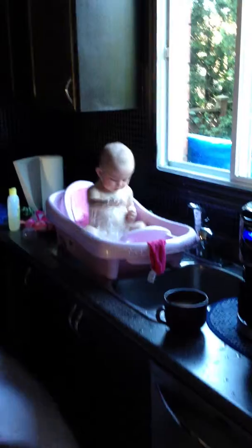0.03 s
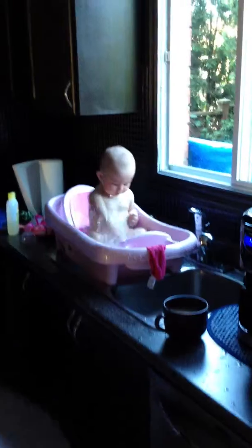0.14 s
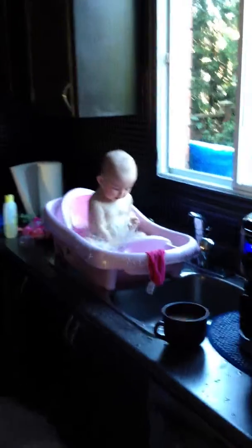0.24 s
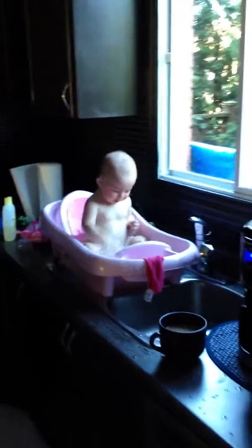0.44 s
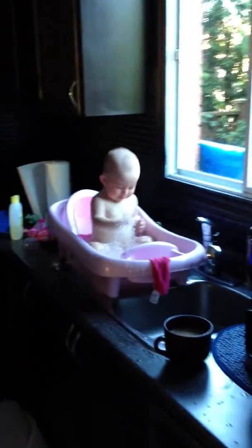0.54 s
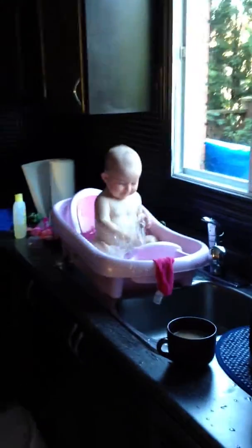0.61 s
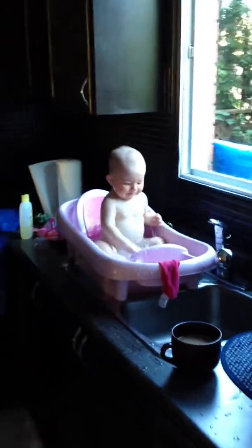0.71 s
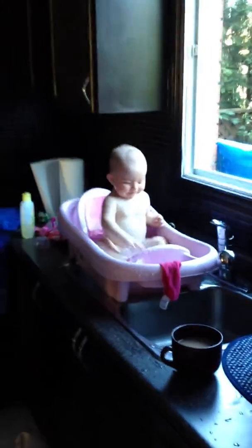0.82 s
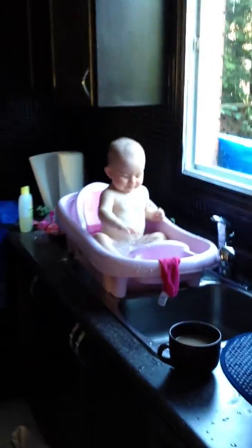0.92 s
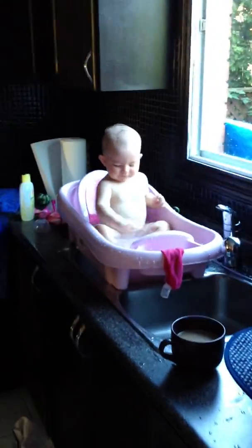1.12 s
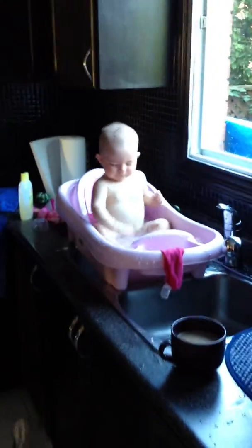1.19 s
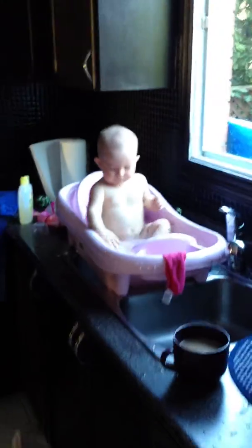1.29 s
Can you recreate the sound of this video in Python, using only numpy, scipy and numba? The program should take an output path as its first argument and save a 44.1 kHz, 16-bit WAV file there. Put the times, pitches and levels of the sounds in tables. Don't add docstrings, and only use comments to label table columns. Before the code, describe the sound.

A baby's hand splashes bathwater, first a bright spray, then the strongest slap with a plunking air pocket, then fading bubbles and one light plastic tick; short indoor echo, faint fridge hum, phone nearby.

```python
import sys
import numpy as np
from scipy import signal
from scipy.io import wavfile
from scipy.ndimage import uniform_filter1d
from numba import njit

SR = 44100
rng = np.random.default_rng(int(sys.argv[2]) if len(sys.argv) > 2 else 0)


def volts_from_decibels(level):
    exponent = np.asarray(level, float) / 20
    return 10 ** exponent


def transcribe(u):
    v = np.clip(np.atleast_2d(u).T, -1, 1)
    q = np.round(v * 32767).astype(np.int16)
    wavfile.write(sys.argv[1], SR, q)


N = 59535
TUB_LOW_HZ = 600


def level(x, db):
    return x * volts_from_decibels(db) / np.sqrt(np.mean(x ** 2))


def band(x, hz, width_hz):
    return signal.lfilter(*signal.iirpeak(hz, hz / width_hz, fs=SR), x)


@njit
def rings(start, hz, t60, size, glide, n, sr):
    out = np.zeros(n)
    for g in range(len(start)):
        first, length = int(start[g] * sr), int(t60[g] * sr)
        fade = np.exp(-np.log(1000.) / (length + 1))
        step = 2 * np.pi * hz[g] / sr
        height, phase = size[g], 0.
        for k in range(max(first, 0), min(first + length, n)):
            out[k] += height * np.sin(phase)
            height *= fade
            phase += step * (1 + glide * (k - first) / length)
    return out


def cloud(s, db, hz, octaves, fade_s, cycles=9.9, rise_s=0.0016, count=2500):
    scatter_db, glide = 2.2, 0.66
    lowest_hz, highest_hz = 120, 15300
    late = 4 * fade_s * rng.random(count)
    pitch = hz * 2 ** (octaves * rng.standard_normal(count))
    t60 = np.minimum(np.log(1000) * cycles / np.pi / pitch, .12)
    size = volts_from_decibels(-scatter_db * np.log(1 - rng.random(count)))
    size = size * np.exp(-late / fade_s) * (1 - np.exp(-late / rise_s))
    size = size * np.sqrt(pitch / hz) * (pitch > lowest_hz) * (pitch < highest_hz)
    power = np.sum(size ** 2 * t60) / (4 * np.log(1000)) / (fade_s / 2)
    return rings(s + late, pitch, t60, size * volts_from_decibels(db) / np.sqrt(power), glide / cycles, N, 1. * SR)


# start in seconds, level in dB, centre pitch in Hz, spread in octaves,
# fade in seconds.
SPLASH_ROWS = [(.06, -48.5, 2254, 1.303, .15), (0.149, -47, 2890, 1.37, .03),
               (0.206, -32.5, 4500, 0.84, .03), (.24, -40.5, 2630, 0.82, .05),
               (0.312, -42.5, 3900, 0.22, 0.036), (.342, -33, 2080, 0.2, .006),
               (.36, -35, 2600, 0.784, .035), (.41, -43, 1510, 0.95, .05), (0.472, -44, 990, 0.35, .05),
               (0.52, -44, 2480, 0.68, .05), (0.602, -46.5, 2685, 1.13, .05),
               (.704, -43, 2600, 0.73, 0.013), (.722, -42.5, 3440, 0.44, 0.02),
               (.65, -52, 3050, 0.96, 0.072), (0.772, -41.5, 3550, 0.18, 0.017),
               (.795, -49, 1270, 1.23, .04), (0.872, -54, 2480, 0.49, .05), (1.035, -61, 3630, 0.22, .03),
               (1.14, -67, 4530, 0.15, 0.037), (.343, -44, 4260, 0.736, 0.11),
               (0.518, -51, 5000, .7, 0.083)]


def splashes():
    return sum(cloud(*row) for row in SPLASH_ROWS)


# start in seconds, level in dB, fade in seconds.
SPRAY_ROWS = [(.085, -59.5, 0.059), (.163, -62, 0.057), (.208, -38, 0.032), (.337, -56, 0.091),
              (.46, -70, 0.059), (.6, -56, 0.03), (.653, -56, 0.018), (0.684, -51.5, 0.018),
              (.7, -57.5, .05), (.818, -59.5, 0.043), (.92, -61.5, 0.031)]


def spray():
    return sum(cloud(s, db, 11300, 0.32, fade_s, rise_s=0.0018) for s, db, fade_s in SPRAY_ROWS)


# start in seconds, level in dB, pitch in Hz, fade in seconds.
GURGLE_ROWS = [(.085, -52.5, 660, 0.029), (.462, -51, 4200, .012), (.14, -49, 867, 0.021),
               (.368, -66, 770, .03), (.372, -35.5, 1162, .02), (.4, -57, 850, .03),
               (.472, -41.5, 883, 0.027), (.5, -45, 965, .025), (.523, -46, 1940, .04),
               (0.554, -46, 3020, 0.014), (.575, -46, 668, 0.037), (.6, -51, 1250, 0.026),
               (.64, -58.5, 680, 0.043), (0.711, -48, 1750, .03), (0.729, -51, 1220, .04),
               (.79, -55.5, 600, .03), (.82, -64, 540, 0.041), (.774, -50, 3560, .015),
               (.87, -57, 1940, .03), (1.071, -60.5, 1430, 0.033), (0.791, -52, 2660, 0.019)]


def gurgles():
    return sum(cloud(s, db, hz, 0.056, fade_s, cycles=10.4, count=24) for s, db, hz, fade_s in GURGLE_ROWS)


# start in seconds, level in dB, pitch in Hz, fade in seconds.
SLOSH_ROWS = [
    (0.201, -51.5, 205, .04),
    (.36, -51.5, 209, 0.067),
    (0.644, -44, 230, 0.0155),
    (.7, -59, 173, 0.045),
]


def slosh():
    return sum(cloud(s, db, hz, 0.504, fade_s, count=60) for s, db, hz, fade_s in SLOSH_ROWS)


def water():
    thin = signal.butter(4, TUB_LOW_HZ, "high", fs=SR, output="sos")
    return signal.sosfilt(thin, splashes() + spray() + gurgles()) + slosh()


# middle in
# seconds, peak in dB, pitch in Hz, length in seconds.
POCKET_ROWS = [(0.107, -49, 659, 0.032), (0.156, -44, 846, 0.022), (0.305, -30, 691, 0.023),
               (0.331, -30, 675, 0.022), (.344, -31, 720, 0.0031), (0.3532, -17.5, 736, 0.0094),
               (0.361, -25.5, 650, 0.0084), (.376, -33.5, 1018, 0.016), (0.441, -38.5, 700, 0.023),
               (.445, -30, 700, 0.0071), (0.468, -29, 890, 0.012), (.488, -42, 810, 0.048),
               (0.509, -46, 896, 0.022), (.525, -54, 920, 0.0051), (0.538, -47, 1222, 0.025),
               (0.586, -44, 684, 0.023), (0.615, -41, 677, 0.019), (0.607, -41.5, 1230, 0.019),
               (0.667, -62, 660, 0.014), (.718, -46.5, 626, 0.021), (.733, -43.5, 654, 0.017),
               (0.799, -51.5, 600, 0.032), (0.824, -48.5, 572, .02), (0.877, -52, 561, 0.025),
               (1.319, -47.5, 1160, 0.0082), (1.342, -55, 1284, 0.03), (1.073, -53.5, 235, 0.072),
               (1.111, -53.5, 239, 0.087), (1.168, -57, 242.5, 0.1), (1.297, -58.5, 233, 0.044)]


def pockets(t):
    rise, skew = 0.019, 0.68
    out = np.zeros(N)
    for s, db, hz, length in POCKET_ROWS:
        u = np.clip((t - s) / length + .5, 0, 1)
        swell = np.sin(np.pi * u ** skew) ** 2
        out += volts_from_decibels(db) * swell * np.sin(2 * np.pi * hz * (t - s) * (1 + rise * (u - .5)))
    return out


def thump():
    s, hz, t60, size = np.array([[.352, 108, 0.22, volts_from_decibels(-42.5)]]).T.copy()
    return rings(s, hz, t60, size, 0., N, 1. * SR)


# start in seconds, level in dB, extra level of the lowest rim mode in dB.
TICK_ROWS = [
    (0.9283, -33.5, 1),
    (.9330, -38.5, -22),
]
# pitch in Hz, level in dB, T60 in seconds.
RIM_MODES = [(1624, 0.5, 0.019), (2600, -6, 0.0041), (3240, -2, 0.0062), (3960, -13, 0.0069),
             (4560, -5, 0.0074), (7750, -14, 0.0016), (11700, -32, 0.0012)]


def rim_ticks():
    rows = []
    for s, db, dull_db in TICK_ROWS:
        for k, (hz, mode_db, t60) in enumerate(RIM_MODES):
            rows.append((s, hz, t60, -volts_from_decibels(db + mode_db + dull_db * (k == 0))))
    s, hz, t60, size = np.array(rows, float).T.copy()
    return signal.lfilter(*signal.butter(3, 1200, "high", fs=SR), rings(s, hz, t60, size, 0., N, 1. * SR))


def walls(send, t):
    t60_s, top_hz, gap_s = 0.5, 8600, .006
    lag = t[:SR // 2]
    tail = rng.standard_normal(len(lag)) * volts_from_decibels(-60 * lag / t60_s) * (lag > gap_s)
    tail = signal.lfilter(*signal.butter(1, top_hz, fs=SR), tail)
    return signal.fftconvolve(send, tail / np.sqrt(np.sum(tail ** 2)))[:N]


# pitch in Hz, level in dB, width in Hz.
FRIDGE_HUMS = [(241.2, -63, 21), (380.5, -66, 22), (562, -83.5, 3.5), (1760, -66.5, 230)]


def fridge():
    return sum(level(band(rng.standard_normal(N), hz, width_hz), db) for hz, db, width_hz in FRIDGE_HUMS)


def walk(rate):
    k = int(SR / rate)
    return level(uniform_filter1d(uniform_filter1d(rng.standard_normal(N), k), k), 0)


# frequency in Hz, relative level in dB per Hz.
KITCHEN_COLOUR = [(80, -35), (150, -0.5), (400, -5.5), (1100, -15), (1800, -11.5), (2600, -20.5),
                  (8000, -25.5), (14000, -30.5)]


def room_noise():
    flicker_db, flicker_rate_hz = 1.2, 9
    hz, db = np.array(KITCHEN_COLOUR, float).T
    air = np.zeros(N)
    for f in 50 * 2 ** (np.arange(26) / 3):
        band_db = np.interp(np.log(f), np.log(hz), db) + flicker_db * walk(flicker_rate_hz)
        air += volts_from_decibels(band_db) * band(band(rng.standard_normal(N), f, f / 3), f, f / 3)
    return level(air, -58)


def scene():
    t = np.arange(N) / SR
    drops, air = water(), pockets(t)
    tub = rim_ticks() + thump()
    wet = walls(volts_from_decibels(-7.5) * drops + volts_from_decibels(-11) * air + volts_from_decibels(-20) * tub, t)
    return (drops + air + tub + wet + fridge() + room_noise())[None]


def top_cut(x):
    return signal.sosfilt(signal.butter(12, 15660, fs=SR, output="sos"), x)


def record(dry):
    start_s, fade_in_s, top_hz = .084, 0.00082, 15450
    x = signal.sosfilt(signal.butter(4, 151, "high", fs=SR, output="sos"), dry)
    x = x - 0.72 * band(x, 9760, 4260)
    x = x + level(band(rng.standard_normal(N), 71.6, 80), -88)
    x = x * np.clip((np.arange(N) / SR - start_s) / fade_in_s, 0, 1)
    x = signal.sosfilt(signal.ellip(8, .2, 60, top_hz, fs=SR, output="sos"), x)
    return top_cut(x)


dry = scene()
out = record(dry)
transcribe(out)
```